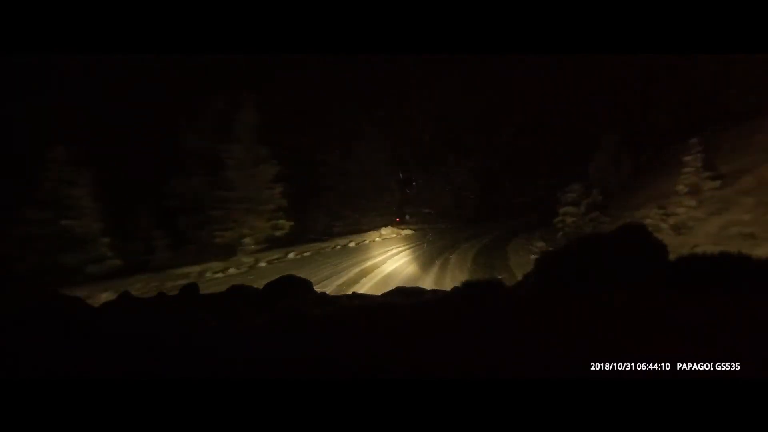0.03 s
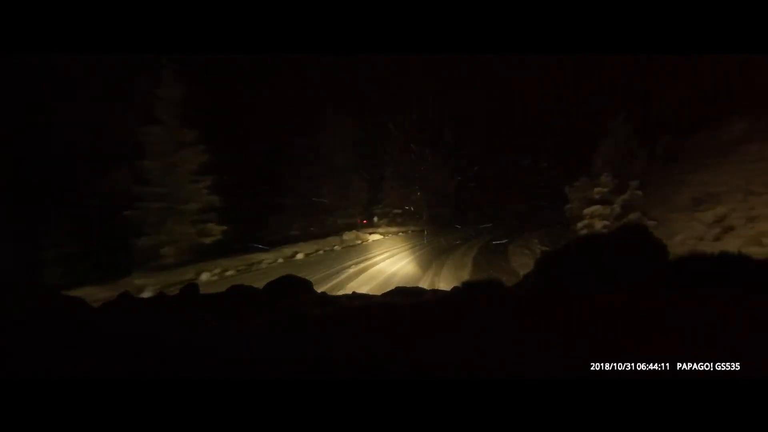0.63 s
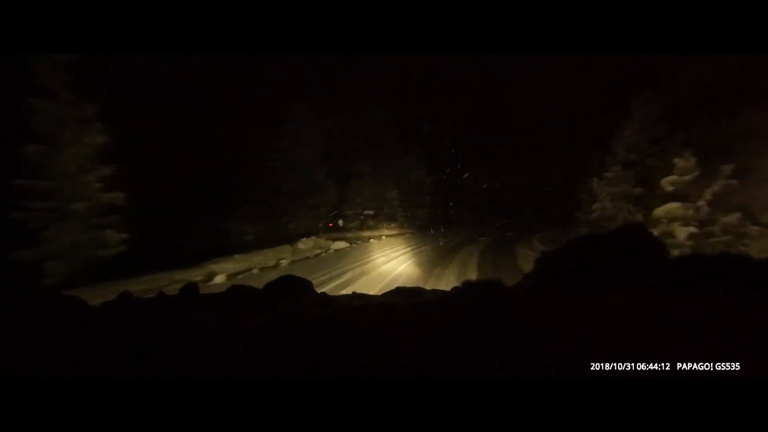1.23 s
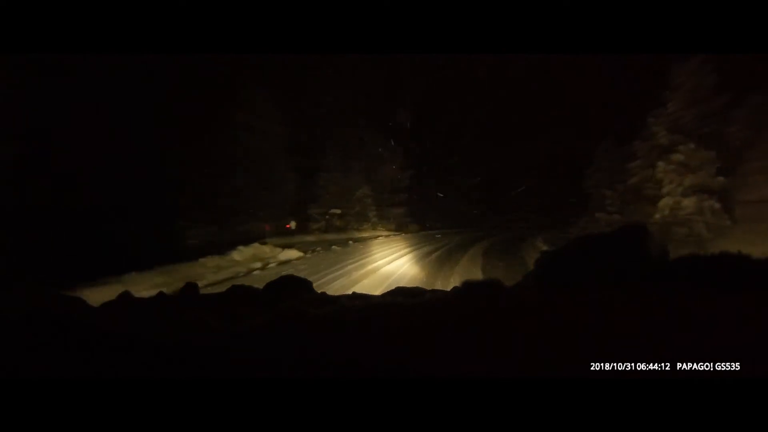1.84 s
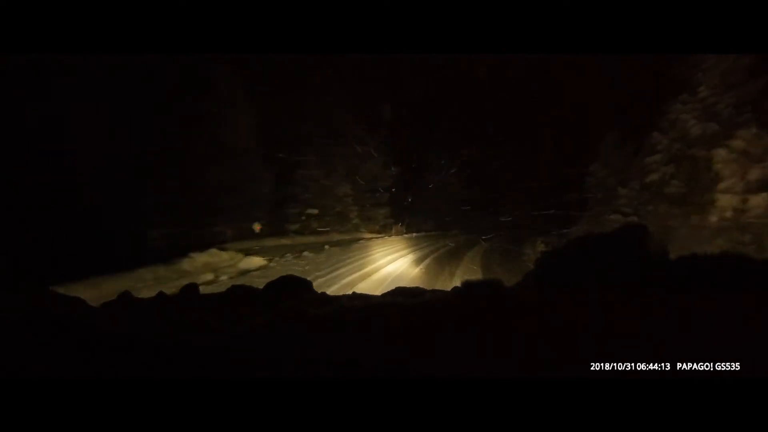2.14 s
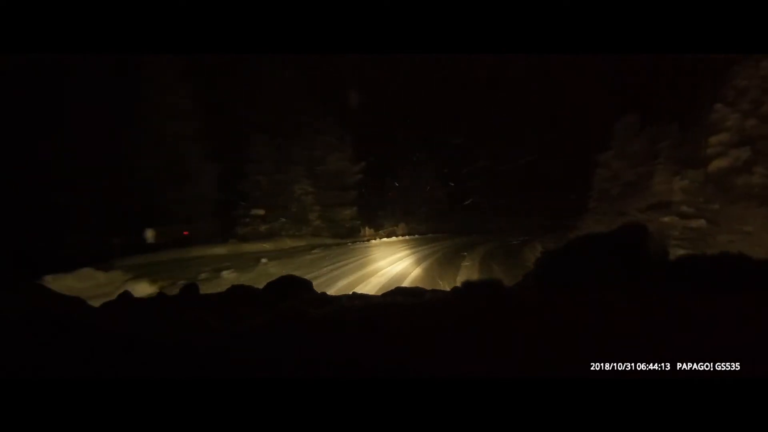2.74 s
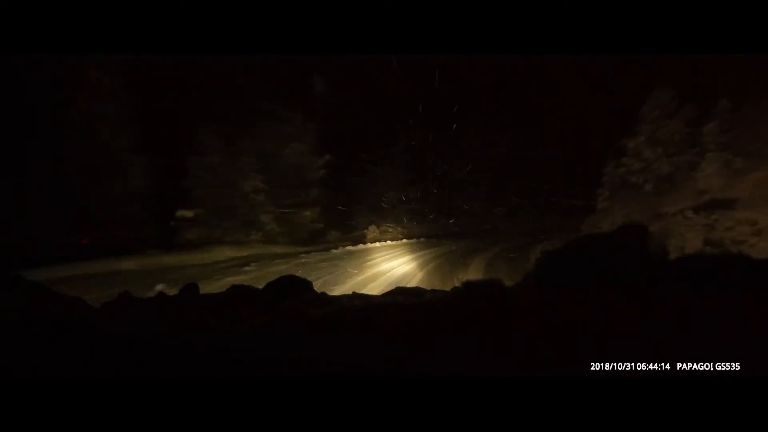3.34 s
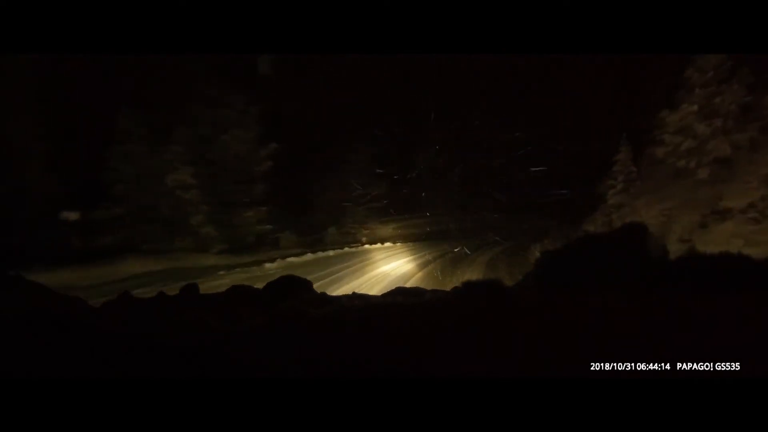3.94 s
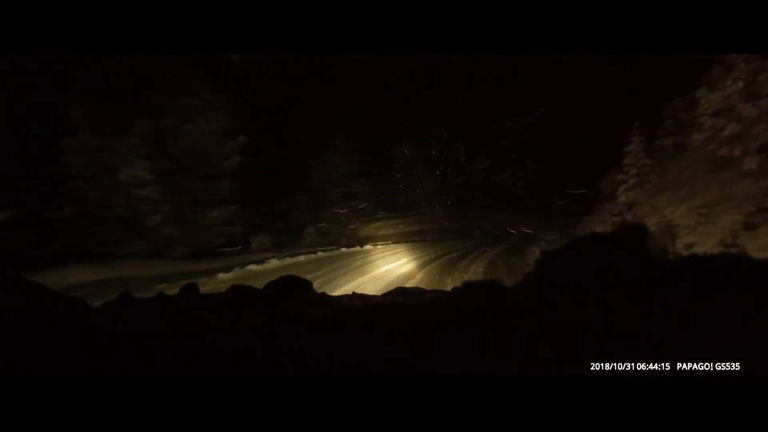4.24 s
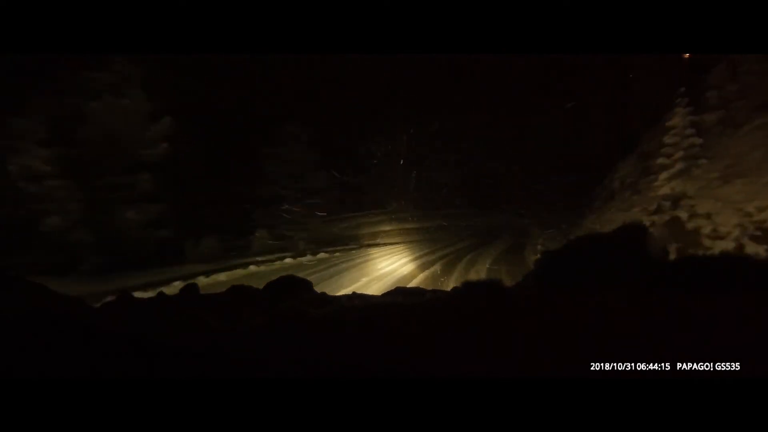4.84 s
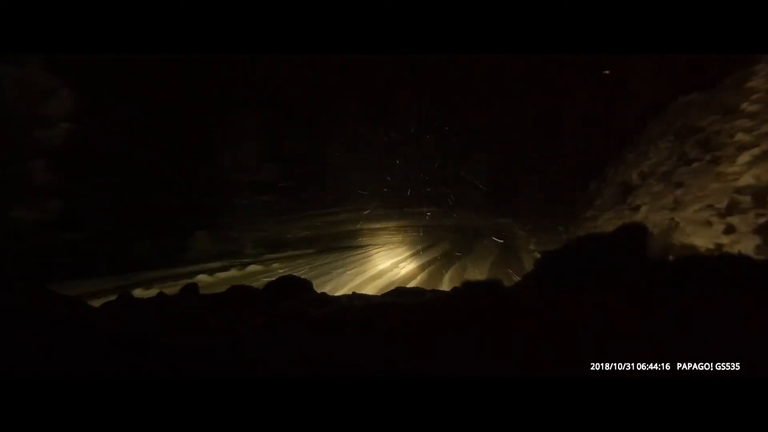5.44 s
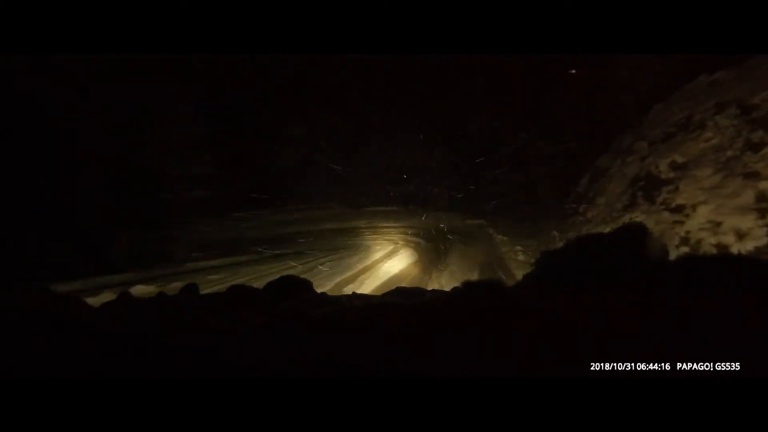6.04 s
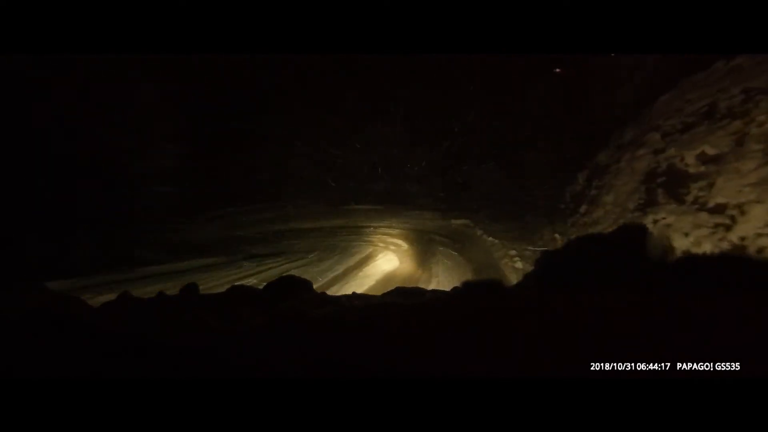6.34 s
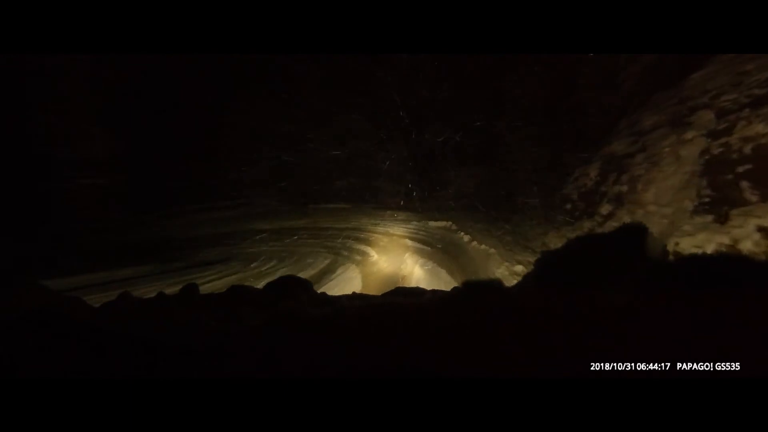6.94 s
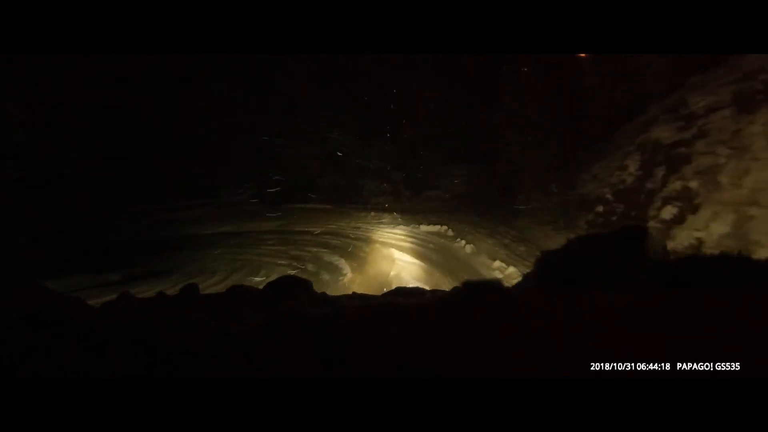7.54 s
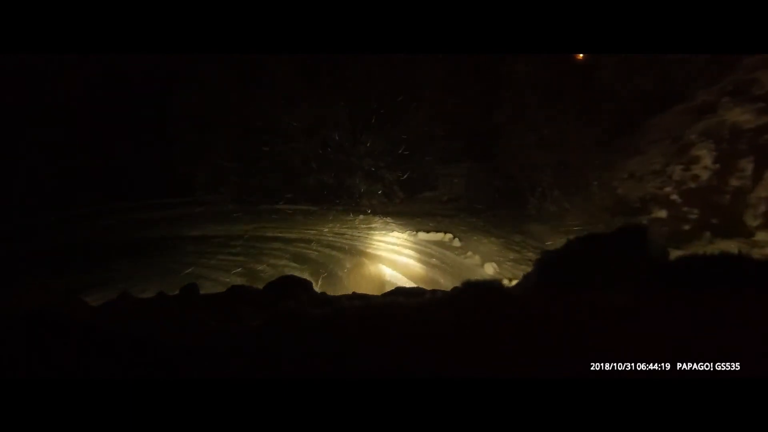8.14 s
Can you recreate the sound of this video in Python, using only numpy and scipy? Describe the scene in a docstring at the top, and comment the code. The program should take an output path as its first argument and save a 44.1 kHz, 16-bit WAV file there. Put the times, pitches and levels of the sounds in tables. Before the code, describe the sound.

A car drives at a steady speed along a snowy road, heard from inside through a small dashboard microphone. A hollow road roar fills the cabin throughout, with a softer, dull wheel rumble beneath it. Above it the tyres give a raspy hiss with a fine crunch, and now and then loose snow sprays faintly against a wheel arch.

```python
"""Driving on packed snow

A car drives steadily along a snowy road, heard through a small dashboard camera.
The uneven road shakes the wheels, which rumble and roar through the resonant body shell.
The tyres hiss and crunch, and loose snow sprays against the wheel arch.
The treble rasps in step with the pressure swings of the roar."""
import sys
import numpy as np
from scipy.fft import rfft, irfft, next_fast_len
from scipy.io import wavfile
from scipy.ndimage import map_coordinates

SR = 44100
rng = np.random.default_rng(int(sys.argv[2]) if len(sys.argv) > 2 else 0)


def wrap_up_sound(samples):
    """Save the sound to the file named by the first command line argument, as 16-bit audio."""
    columns = np.atleast_2d(samples).T
    # keep every value between -1 and 1, then stretch to whole-number steps
    tamed = np.clip(columns, -1, 1)
    steps = np.round(tamed * 32767).astype(np.int16)
    wavfile.write(sys.argv[1], SR, steps)


N = 361179
ROAR_DB, HISS_DB = -16, -25.0  # base levels at a steady speed


def road_roar(level_db, ruts, jolt_db):
    """Structure-borne sound: the shaken body shell roars, a little louder over every rut."""
    # spectrum of the road in the cabin: frequency_hz, relative_db
    roar_spectrum = [(100, -39), (200, -17), (280, -5.5), (380, -3), (490, 0), (700, -1.5), (900, -2.5),
                     (1200, -4.5), (1400, -7), (1650, -11), (2200, -13.5), (4000, -25.5), (8000, -90)]
    shaking = rng.standard_normal(N) * amp(jolt_db * ruts)
    return amp(level_db) * coloured(shaking, roar_spectrum)


def snow_hiss(level_db, ruts, pressure, jolt_db, rasp_db, grains_per_s, crunch_db):
    """Amplitude modulation: ruts and cabin pressure vary the hiss, crunch and sizzle of the tread."""
    # tyres on snow, coloured by the microphone's housing: frequency_hz, relative_db
    hiss_spectrum = [(700, -28), (1400, -4), (2000, -2.5), (2600, -1), (3400, -1.65), (4300, -5.5),
                     (5200, -7), (6250, -17.5), (7000, -15), (7700, -19.5), (8250, -27.5), (9100, -23),
                     (9800, -35), (11300, -31.5), (13400, -48)]
    cracks = rng.random(N) < grains_per_s / SR
    crunch = unit(cracks * rng.uniform(-1.1, 1, N))
    rush = rng.standard_normal(N) + amp(crunch_db) * crunch
    # the treble flares in each trough of the cabin pressure, which makes it rasp
    rasp = amp(jolt_db * ruts - rasp_db * 2 * np.tanh(unit(pressure) / 2))
    hiss = amp(level_db) * coloured(rush * rasp, hiss_spectrum)
    sizzle = resonance(rng.standard_normal(N) * rasp, centre_hz=5100, width_hz=990)
    clumps_db = 1.5 * wobble(knots_per_s=20)  # grit under the tread comes in clumps
    sizzle_db = -39.5 + 1.7 * (level_db - HISS_DB) + clumps_db  # swells faster than the hiss
    return hiss + amp(sizzle_db) * sizzle


def shell_resonance():
    """Forced resonance: the road excites a hollow note of the body shell."""
    # the resonance comes and goes with the road: time_s, level_db
    hollow_levels = [(0, -30), (.4, -27), (.85, -29), (1.5, -29.5), (2.0, -24.5), (2.3, -31), (2.65, -26),
                     (3.15, -46), (3.65, -27), (3.95, -38), (4.35, -26.5), (4.75, -26), (5.6, -33),
                     (5.95, -30), (6.6, -34.5), (7.3, -28.5), (8.19, -27)]
    hollow = resonance(rng.standard_normal(N), centre_hz=389.6, width_hz=143)
    return amp(curve(hollow_levels)) * hollow


def wheel_rumble(level_db):
    """Random vibration: the uneven road shakes the suspension, which passes a dull rumble."""
    # spectrum of the wheels through the suspension: frequency_hz, relative_db
    rumble_spectrum = [(10, -24), (25, -20), (50, -19), (70, -13.5), (97, -9), (120, -7), (150, -3),
                       (200, 0), (250, 0.5), (330, -12), (600, -52)]
    return amp(level_db) * coloured(rng.standard_normal(N), rumble_spectrum)


def snow_spray(grains_per_s, half_width_s):
    """Shot noise: fine grains strike the wheel arch at random, in brief swells."""
    # sprays of loose snow: peak_s, level_db
    sprays = [(1.43, -34), (2.42, -31.5), (2.82, -31), (3.68, -33), (6.35, -30), (7.19, -31.5), (7.74, -34)]
    # the band that the wheel arch passes: frequency_hz, relative_db
    arch_response = [(2000, -25), (3500, -11), (4400, 0), (5300, 0), (6200, -12), (9000, -28), (12000, -45)]
    envelope = swells((peak_s, amp(level_db), half_width_s) for peak_s, level_db in sprays)
    grains = (rng.random(N) < grains_per_s / SR) * rng.uniform(-0.73, 1, N)
    return envelope * coloured(grains, arch_response)


def surface_levels():
    """Roughness excitation: rough road lifts the rumble and roar, coarse snow the hiss."""
    # wheel rumble as the road grows smoother and rougher: time_s, level_db
    roughness = [(0, -31), (.55, -32.5), (.9, -37), (1.2, -32.5), (2.1, -34), (2.55, -33.5), (3.15, -34.5),
                 (3.55, -32.5), (4.1, -36.5), (4.7, -32), (4.97, -35), (5.25, -32), (5.5, -34),
                 (5.78, -29.5), (6.9, -35), (7.5, -33), (7.75, -31), (8.19, -31.5)]
    # the roar over ridges and smooth spots: centre_s, rise_db, half_width_s
    ridges = [(.45, .9, 0.18), (2.7, 1, 0.27), (3.17, -1, 0.082), (3.37, 1.5, .07), (5.95, 0.2, 0.091),
              (6.68, 1.1, 0.1), (7.85, -1.3, 0.052), (8.1, 1.5, 0.072)]
    # the hiss over stretches of coarser snow: centre_s, rise_db, half_width_s
    coarse_patches = [(.5, 0.9, 0.27), (1.0, 1.4, 0.065), (2.43, 1, .12), (2.82, 1.5, 0.19),
                      (3.45, 1.5, 0.2), (3.66, 1.3, 0.068), (4.22, 1, 0.13), (6.0, 1, .15),
                      (7.28, 1.1, .15), (7.93, 1, .05)]
    rumble_db = curve(roughness)
    roar_db = ROAR_DB + 0.034 * (rumble_db - rumble_db.mean()) + swells(ridges)
    hiss_db = HISS_DB + swells(coarse_patches) + 0.3 * wobble(knots_per_s=16)
    return rumble_db, roar_db, hiss_db


def amp(db):
    """Decibels to amplitude ratio."""
    return 10 ** (np.asarray(db) / 20)


def unit(x):
    """Normalisation to rms 1."""
    return x / np.sqrt(np.mean(x ** 2) + 1e-20)


def curve(rows):
    """Linear interpolation of (time_s, value) rows at every sample."""
    time_s, values = np.transpose(rows)
    return np.interp(np.arange(N) / SR, time_s, values)


def swells(rows):
    """A sum of Gaussian rises and dips, each at 1/e of its height one half-width from its centre."""
    t = np.arange(N) / SR
    return sum(height * np.exp(-((t - centre_s) / half_width_s) ** 2)
               for centre_s, height, half_width_s in rows)


def wobble(knots_per_s):
    """Smooth random fluctuation: a spline through random knots, at rms 1."""
    knots = rng.standard_normal(int(N * knots_per_s / SR) + 4)
    return unit(map_coordinates(knots, [np.arange(N) * knots_per_s / SR]))


def filtered(x, response):
    """Linear filtering: the spectrum of x times a frequency response."""
    size = next_fast_len(N + SR // 2)
    hz = np.fft.rfftfreq(size, 1 / SR)
    return irfft(rfft(x, size) * response(hz), size)[:N]


def coloured(x, spectrum):
    """Spectral shaping by (frequency_hz, relative_db) points on a log axis, at rms 1."""
    hz, db = np.transpose(spectrum)
    return unit(filtered(x, lambda f: amp(np.interp(np.log(f + 1), np.log(hz), db, right=-120))))


def resonance(x, centre_hz, width_hz):
    """Two damped resonators in cascade pass a steep-sided band of x, at rms 1."""
    def response(hz):
        damping = 1j * hz * width_hz
        return (damping / (centre_hz ** 2 - hz ** 2 + damping)) ** 2
    return unit(filtered(x, response))


def scene():
    """Superposition: the sources add in the cabin; roar and hiss ride on the same ruts."""
    rumble_db, roar_db, hiss_db = surface_levels()
    profile = unit(wobble(knots_per_s=45) + 2.4 * wobble(knots_per_s=170))
    ruts = unit(np.tanh(profile / 2))  # the random jolts are bounded, so the crunch stays even, without sharp ticks
    cabin = wheel_rumble(rumble_db) + road_roar(roar_db, ruts, jolt_db=0.83) + shell_resonance()
    hiss = snow_hiss(hiss_db, ruts, cabin, jolt_db=0.88, rasp_db=4.0, grains_per_s=3000, crunch_db=-16.0)
    spray = snow_spray(grains_per_s=2500, half_width_s=0.03)
    return (cabin + hiss + spray)[None]


def record(dry):
    """Saturation and band limiting: the camera rounds the highest peaks and cuts the top treble."""
    ceiling, top_hz = 0.92, 13500
    rounded = dry[0] / (1 + np.abs(dry[0] / ceiling) ** 8) ** (1 / 8)
    return filtered(rounded, lambda hz: hz < top_hz)[None]


dry = scene()
out = record(dry)
wrap_up_sound(out)
```